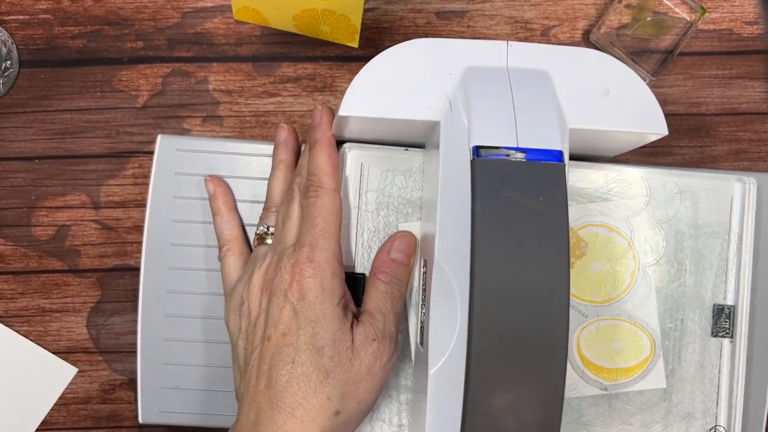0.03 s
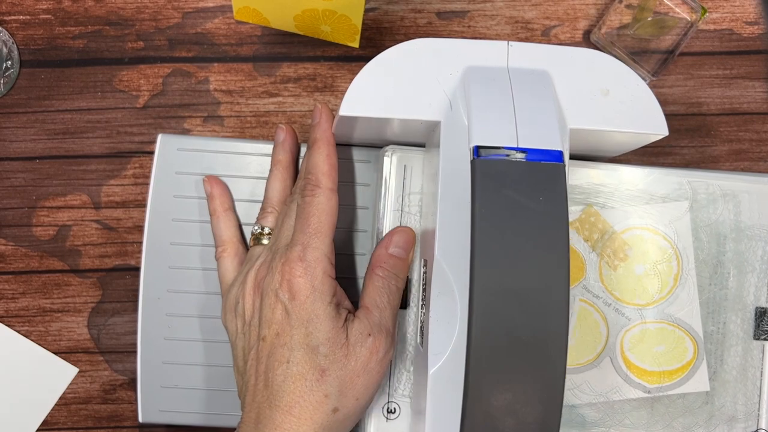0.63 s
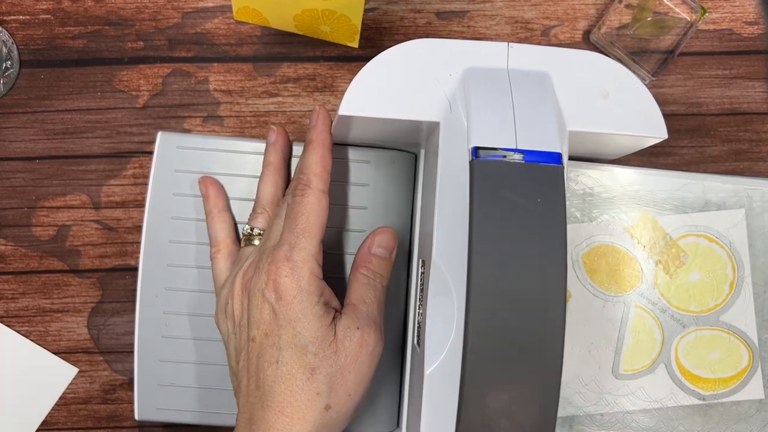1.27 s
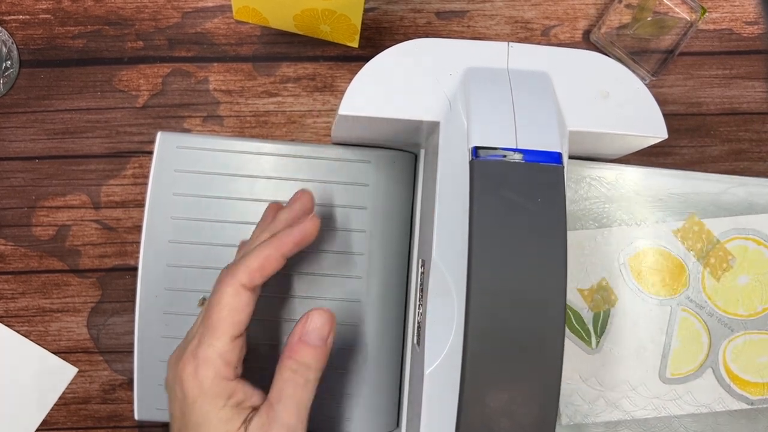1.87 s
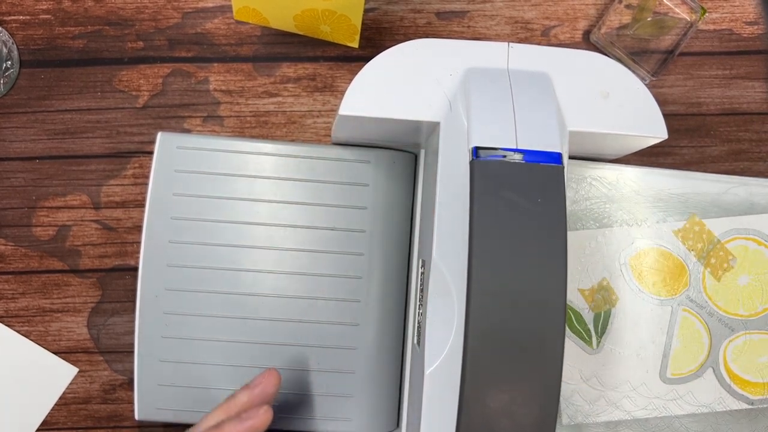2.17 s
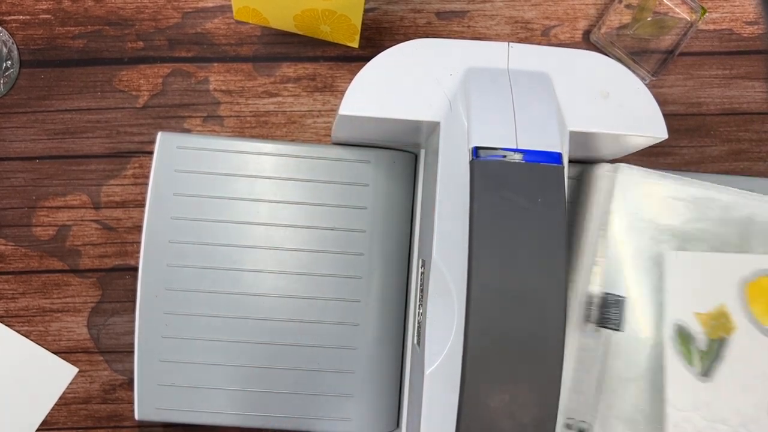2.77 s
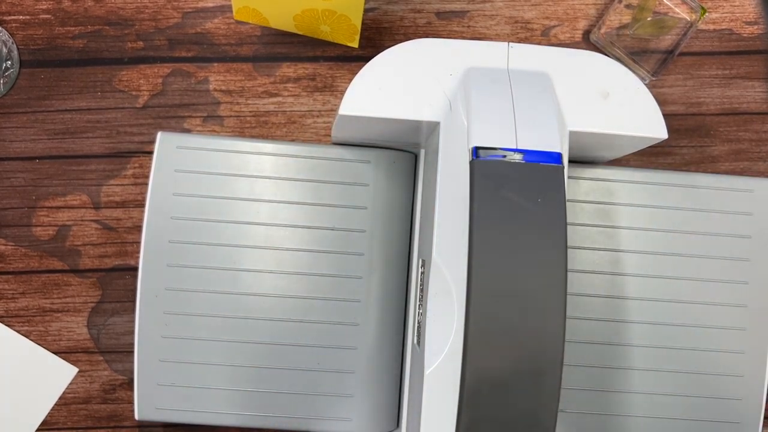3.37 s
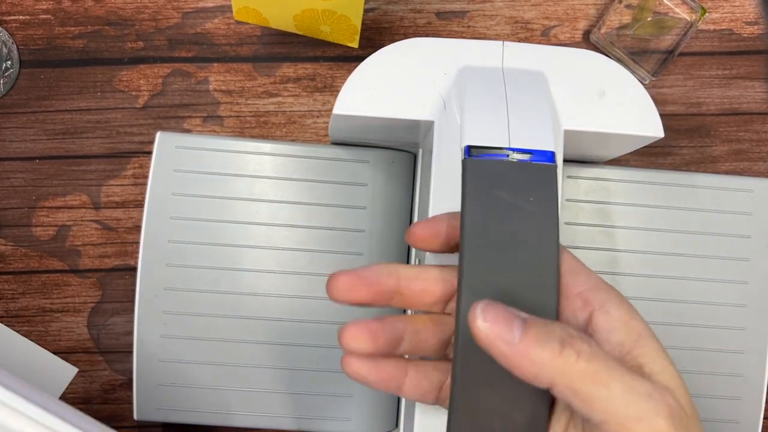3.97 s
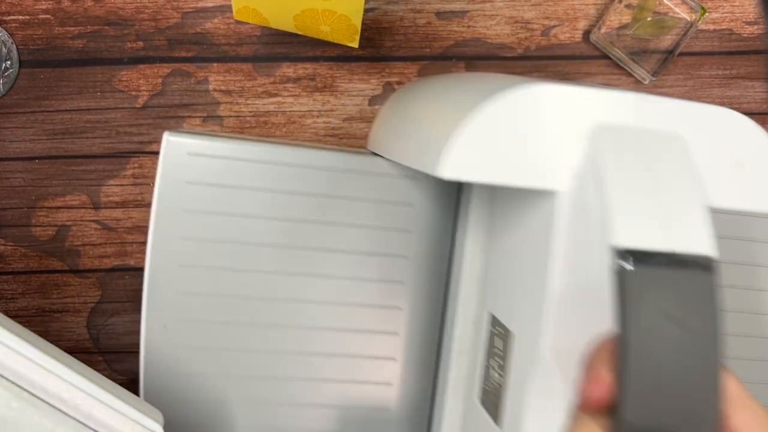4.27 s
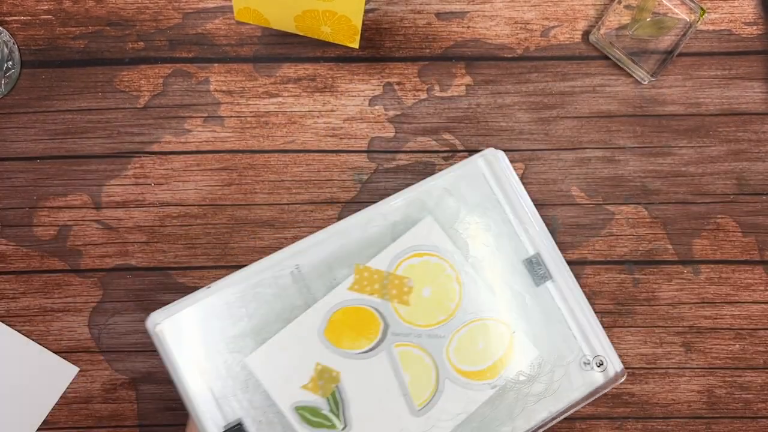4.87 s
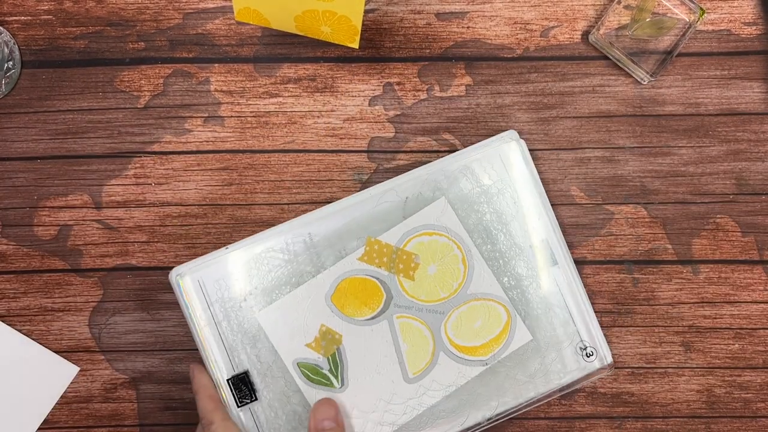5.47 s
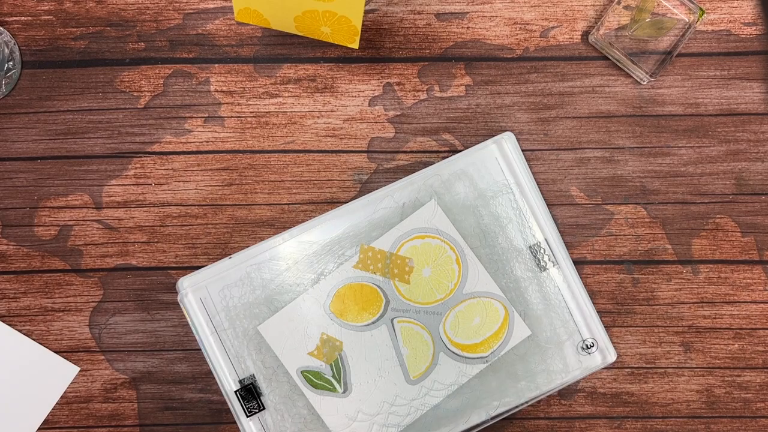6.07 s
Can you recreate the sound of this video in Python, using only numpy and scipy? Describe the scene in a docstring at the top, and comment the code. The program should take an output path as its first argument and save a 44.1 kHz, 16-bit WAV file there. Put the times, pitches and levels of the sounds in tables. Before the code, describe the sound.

A hand-cranked die cutter creaks, snaps and knocks as plastic plates roll through, then the stack clatters out and drops on a wooden table.

```python
"""A hand-cranked die cutter on a wooden table rolls a stack of plastic plates through its rollers.
Gears creak and rumble, the plates snap under pressure, the hollow housing knocks and the table booms.
The stack is lifted out with a clatter; parts tick and fingers brush the plates. The platform rings as
the machine is lifted. Fingertips tap the stack, which drops on the table and slides, in a small room."""
import sys
import numpy as np
from scipy import signal
from scipy.fft import rfft, irfft
from scipy.io import wavfile

SR = 44100
rng = np.random.default_rng(int(sys.argv[2]) if len(sys.argv) > 2 else 0)


def inscribe(sig):
    """Save sig as 16-bit PCM at rate SR to the path in sys.argv[1].

    A 1-D sig is mono; a 2-D sig holds one channel per row.
    Samples are clipped to [-1, 1] before scaling.
    """
    pcm = np.round(np.clip(np.atleast_2d(sig).T, -1, 1) * 32767)
    wavfile.write(sys.argv[1], SR, pcm.astype(np.int16))


N = 269451
TIME_S = np.arange(N) / SR
HIT_N = SR // 3
HIT_S = np.arange(HIT_N) / SR

# crank effort, greatest with the dies between the rollers; sliding stack: (time [s], level [dB])
CRANK_EFFORT = [(0, -57.5), (1.0, -56.5), (1.15, -51), (2.25, -63.5), (2.33, -75)]
SLIDE_LEVEL = [(5.55, -41.5), (5.76, -54.5), (5.85, -41.5), (6.11, -40.5)]
# light ticks of housing, plates and platform: (time [s], peak [dB])
LIGHT_TICKS = [(0.014, -30.5), (0.352, -31.5), (0.432, -34), (0.464, -32), (1.058, -37), (1.117, -31),
               (1.25, -34), (2.579, -29), (3.04, -40.5), (3.54, -31.5), (3.956, -45), (4.247, -41.5),
               (4.308, -33.5), (4.418, -32.5), (4.498, -32), (4.838, -41.5), (4.896, -33.5), (4.995, -37),
               (5.069, -35.5), (5.149, -38), (5.535, -33)]
# plates snapping; blows reaching the table: (time [s], level [dB], pitch [Hz])
PLATE_SNAPS = [(0.193, -14.5, 992), (0.624, -13, 1577)]
TABLE_THUMPS = [(0.772, -27, 300), (0.782, -26.5, 58), (1.208, -33, 127), (1.55, -29.5, 133),
                (1.75, -26, 117), (2.668, -34, 312), (2.693, -20, 235.6), (4.051, -20, 91),
                (4.883, -27, 111.6), (5.209, -30.5, 84), (5.554, -9.5, 343), (5.564, -15.5, 159),
                (5.579, -29, 196), (5.886, -37, 327)]
# blows on housing and stack: (time [s], strength [dB], hardness as treble over bass [dB], pitch [Hz])
HOUSING_KNOCKS = [(0.332, -30, -33, 800), (0.749, -28, -11, 820), (0.769, -7, -14, 770),
                  (1.077, -34.5, -8, 1660), (1.138, -33, -17, 830), (1.301, -22.5, -15, 1610),
                  (1.345, -29.5, -24, 860), (1.433, -36, -36, 850), (1.482, -31.5, -24, 1310),
                  (1.545, -34.5, -40, 845), (1.639, -27.5, -21.5, 970), (1.732, -20, -16.5, 1070),
                  (1.781, -24.5, -14.5, 950), (1.872, -25.5, -30, 870), (1.966, -29, -26.5, 854),
                  (2.027, -31.5, -15.5, 690), (2.159, -35, -25.5, 840), (2.205, -31, -38, 906),
                  (2.431, -38.5, -9, 1210), (2.449, -23, -14.5, 980)]
STACK_CLATTER = [(2.665, -6, -33.5, 890), (2.7, -6.5, -13, 1470), (2.761, -24.5, -42, 840),
                 (3.064, -29.5, -16.5, 890), (3.335, -27, -4, 1960), (4.055, -29, -9.5, 1130),
                 (4.069, -26, -14, 826), (4.917, -30.5, -4, 1830), (5.198, -27.5, -19, 2770),
                 (5.208, -25, -20.5, 900), (5.244, -29.5, -14, 1140), (5.551, -14, -44, 900),
                 (5.581, -31, -3, 1640), (5.595, -19, -42, 1150), (5.608, -25.5, -5.5, 1130),
                 (5.657, -36, -11, 2100), (5.689, -26.5, -9, 1150), (5.757, -33.5, -0.5, 1400)]
# fingers and plates brushing: (start [s], length [s], level [dB])
BRUSHES = [(3.259, 0.19, -58.5), (3.535, 0.48, -61.5), (3.766, 0.17, -56.5), (4.838, 0.34, -59)]
# modes: (frequency [Hz], level [dB], t60 [s])
HOUSING_MODES = [(691, -6, 0.16), (730, 5.5, 0.058), (856.5, 3, 0.067), (970, -3, 0.063),
                 (1173, -2.5, 0.11), (1753, 5, 0.069)]
TABLE_MODES = [(66, 0, .19), (118, 0, .12), (146, 1, .13), (202, -2.5, .11), (236, -1, .11), (280, 1, .1),
               (354, 4, .055)]
STACK_MODES = [(826, 3, 0.042), (952, 3, 0.037), (1134, -0.5, 0.07), (1554, 1, 0.0072), (1925, -4, 0.025),
               (2385, -3.5, 0.05), (2735, -5, 0.024)]
PLATFORM_MODES = [(769.5, 0.5, 0.35), (844, 2.5, 0.16), (1690, -2.5, 0.15)]
# dense small modes of housing and plates: (frequency [Hz], gain [dB])
PLASTIC_EQ = [(150, -14), (500, -8), (850, 0), (2300, -12.5), (6000, -22.5), (16000, -31.5)]
ACRYLIC_EQ = [(150, -7.5), (950, -0.5), (2200, -3.5), (4500, -6.5)]
# spectra of room air, tick, snap, brush and slide: (frequency [Hz], gain [dB])
AIR_EQ = [(20, -31), (58, 8.5), (85, -3), (250, -18), (1000, -34), (16000, -49.5)]
TICK_EQ = [(400, -11), (950, 5), (2000, -2), (6000, -18)]
CRACK_EQ = [(200, -17), (1000, -12.5), (4000, -10.5), (5400, -4.5), (9000, -5.5), (12000, 1.5),
            (16000, -15.5)]
BRUSH_EQ = [(1900, 4.5), (4000, -2.5), (13000, -4)]
SLIDE_EQ = [(60, -3.5), (1100, -6), (2700, -11.5), (3600, -16), (5500, -9), (6200, -6), (7000, -11.5),
            (16000, -20.5)]
# stereo difference passed by the microphone ports: (frequency [Hz], gain [dB])
SIDE_EQ = [(50, -10), (400, 1), (5000, 0), (9000, -24.5)]


def undb(db):
    """Decibels to gain."""
    return 10 ** (np.asarray(db) / 20)


def level(x, db):
    """Set the rms."""
    return x * undb(db) / np.sqrt(np.mean(x ** 2))


def peak(x, db):
    """Set the peak."""
    return x * undb(db) / np.abs(x).max()


def burst(x, db):
    """Set the rms of the first 25 ms."""
    return x * undb(db) / np.sqrt(np.mean(x[:, :SR // 40] ** 2))


def curve(rows):
    """Gain from (time [s], level [dB]) rows, silent outside them."""
    return undb(np.interp(TIME_S, *np.transpose(rows), left=-120, right=-120))


def fade(t60_s):
    """Exponential decay."""
    return np.exp(-np.log(1000) * HIT_S / max(t60_s, 1e-4))


def band(x, hz, kind, order=4):
    """Butterworth filter."""
    return signal.sosfilt(signal.butter(order, hz, kind, fs=SR, output="sos"), x)


def colour(x, eq):
    """Minimum-phase filter from (frequency [Hz], gain [dB]) rows."""
    hz, db = np.transpose(eq)
    size = 8192
    log_hz = np.log(np.fft.rfftfreq(size, 1 / SR) + 1)
    cepstrum = irfft(np.log(undb(np.interp(log_hz, np.log(hz), db))))
    cepstrum[1:size // 2] *= 2
    cepstrum[size // 2 + 1:] = 0
    impulse = irfft(np.exp(rfft(cepstrum)))
    return signal.oaconvolve(x, impulse[None], axes=1)[:, :x.shape[1]]


def noise(count, width=0.38):
    """Stereo noise; width is side over mid."""
    mid, side = rng.standard_normal((2, count))
    return np.array([mid + width * side, mid - width * side])


def wander(knots):
    """Random line across the scene."""
    return np.interp(TIME_S, np.linspace(0, TIME_S[-1], knots), rng.standard_normal(knots))


def add(track, at_s, sound):
    """Mix a sound in."""
    start = max(int(at_s * SR), 0)
    track[:, start:start + sound.shape[1]] += sound[:, :N - start]


def friction(grain_db):
    """Countless tiny slips, varying in strength every few ms."""
    slips = wander(N // 150)
    return noise(N) * undb(grain_db * slips)


def favour(modes, pitch_hz, db_per_oct=22.5):
    """The place of contact favours modes near one pitch."""
    return [(hz, db - db_per_oct * abs(np.log2(hz / pitch_hz)), t60_s) for hz, db, t60_s in modes]


def ring(modes, scatter_db=0.95, detune=0.015, spread_rad=0.12):
    """Damped modes build up, weighted anew by each contact; each side hears its own phase."""
    out = 0
    for hz, db, t60_s in modes:
        size, shift, start, skew = rng.standard_normal(4)
        phase = 2 * np.pi * (hz * (1 + detune * shift) * HIT_S + start)
        phase = phase + spread_rad * skew * np.array([[1], [-1]])
        out = out + undb(db + scatter_db * size) * np.sin(phase) * fade(t60_s)
    return out * (1 - fade(0.014)) ** 2


def gears():
    """Teeth and rollers catch unevenly and rumble in the table; plates hiss over the platform."""
    creaks = np.zeros((2, N))
    for at_s in np.arange(0, CRANK_EFFORT[-1][0], 0.036):
        late, size = rng.standard_normal(2)
        creak = ring(favour(HOUSING_MODES, 900), scatter_db=6, detune=0.09)
        add(creaks, at_s + 0.019 * late, burst(creak * fade(0.1) * (1 - fade(0.008)), 5 * size))
    teeth = colour(band(friction(3.7), 1700, "low"), PLASTIC_EQ)
    rumble = band(friction(2.1), [55, 200], "band")
    surge = undb(2 * wander(60))
    hiss = band(friction(2), [2500, 14000], "band") * surge
    mix = level(creaks, -4) + level(teeth, -7) + level(rumble, -2) + level(hiss, -10.5)
    return mix * curve(CRANK_EFFORT)


def light_ticks():
    """Light, dry ticks of housing, plates and platform."""
    out = np.zeros((2, N))
    for at_s, db in LIGHT_TICKS:
        add(out, at_s, peak(colour(noise(HIT_N) * fade(0.05), TICK_EQ), db))
    return out


def scatter(x, swell_s, count=14):
    """A cluster of delayed copies that swells and dies away."""
    jitter, size = rng.random(count), rng.standard_normal(count)
    age = (np.arange(count) + jitter) / 3
    lags = (age * swell_s * SR).astype(int)
    impulse = np.bincount(lags, size * age * np.exp(-age))
    return signal.fftconvolve(x, impulse[None], axes=1)[:, :x.shape[1]]


def plate_snaps(resonance_db=14.5, echo_s=0.0081):
    """Stress lets go: a short crack with one broad resonance, thrown back by a nearby hard surface."""
    out = np.zeros((2, N))
    for at_s, db, hz in PLATE_SNAPS:
        spectrum = rfft(noise(HIT_N) * fade(0.017))
        tilted = irfft(spectrum / np.sqrt(np.abs(spectrum)), HIT_N)
        crack = colour(tilted * fade(0.04), CRACK_EQ)
        crack = colour(crack, [(hz / np.sqrt(2), 0), (hz, resonance_db), (hz * np.sqrt(2), 0)])
        add(out, at_s, burst(crack, db - 11))
        add(out, at_s + echo_s, burst(scatter(crack, swell_s=0.0049), db - 18.5))
    return out


def dense_modes(eq, t60_s, contact_s):
    """The crowd of small modes in a struck plastic part."""
    return colour(noise(HIT_N) * fade(t60_s) * (1 - fade(6 * contact_s)), eq)


def blows(events, modes, eq, *, dense_t60_s, tick_t60_s, base_contact_s, drag,
          knock_db, clack_db, ring_db, tick_db, rebound_db):
    """Plastic on plastic: knock, clack, ring, tick and rebound; drag lengthens weak contacts."""
    out = np.zeros((2, N))
    for at_s, low_db, hard_db, pitch_hz in events:
        mid_db, high_db = low_db + 0.59 * hard_db, low_db + hard_db
        contact_s = base_contact_s * undb(-drag * low_db)
        strike = dense_modes(eq, dense_t60_s, contact_s)
        rebound = dense_modes(eq, dense_t60_s, contact_s)
        tick = colour(noise(HIT_N, 0.62) * fade(tick_t60_s) * (1 - fade(2 * contact_s)), eq)
        add(out, at_s - contact_s, peak(band(strike, 1200, "low"), low_db + knock_db))
        add(out, at_s - contact_s, burst(band(strike, [1400, 4000], "band"), mid_db + clack_db))
        drive_db = min(low_db, -12.5)  # heavier blows press the parts together and ring no louder
        add(out, at_s, burst(ring(favour(modes, pitch_hz)), drive_db + ring_db))
        tick = burst(band(tick, 3800, "high"), high_db + tick_db)
        top_db = 0.32 * min(high_db + 30, 11)  # weaker tick: longer contact, duller top octave
        add(out, at_s, colour(tick, [(7000, 0.0031), (12500, top_db)]))
        rebound_s = at_s + rng.uniform(0.0079, 0.023)
        add(out, rebound_s, peak(band(rebound, 2600, "low"), low_db + rebound_db))
        # a faint swell of noise softens the onset
        faint = burst(colour(noise(HIT_N) * fade(0.06), eq), (low_db + mid_db) / 2 - 25.5)
        swell_n = min(int(at_s * SR), SR // 20)
        add(out, at_s - swell_n / SR, faint[:, swell_n::-1])
    return out


def housing_knocks():
    """The hollow housing knocks as the crank turns."""
    return blows(HOUSING_KNOCKS, HOUSING_MODES, PLASTIC_EQ,
                 dense_t60_s=0.049, tick_t60_s=0.064, base_contact_s=0.000795, drag=0.42,
                 knock_db=-1, clack_db=-7.5, ring_db=-12.5, tick_db=-2.5, rebound_db=-12.5)


def push(db, pitch_hz, rise_cycles=5.4):
    """The table top booms; the length of the push decides which modes answer most."""
    load_shifts = 1 + 0.036 * rng.standard_normal(len(TABLE_MODES))
    boom = 0
    for (hz, mode_db, t60_s), shift in zip(favour(TABLE_MODES, pitch_hz, db_per_oct=9.5), load_shifts):
        boom = boom + undb(mode_db) * np.sin(2 * np.pi * hz * shift * HIT_S) * fade(t60_s)
    panels = band(noise(HIT_N, 0.5) * fade(0.14), min(1.9 * pitch_hz, 480), "low")
    return (peak(boom, db + 11.5) + peak(panels, db - 10)) * (1 - fade(rise_cycles / pitch_hz))


def table_thumps(settle_s=0.012, settle_hz=79, feet_hz=272):
    """Each blow pushes the table, then its weight settles; housing knocks enter via the rubber feet."""
    out = np.zeros((2, N))
    for at_s, db, pitch_hz in TABLE_THUMPS:
        add(out, at_s, push(db, pitch_hz))
        add(out, at_s + settle_s, push(db - 11.5, settle_hz))
    for at_s, db, _, _ in HOUSING_KNOCKS:
        add(out, at_s, push(0.77 * db - 22, feet_hz))
    return band(out, 45, "high", order=2)


def stack_clatter():
    """The plates and their dies strike each other."""
    return blows(STACK_CLATTER, STACK_MODES, ACRYLIC_EQ,
                 dense_t60_s=0.062, tick_t60_s=0.035, base_contact_s=0.00112, drag=0,
                 knock_db=-6.5, clack_db=-12.5, ring_db=-14.5, tick_db=-1.5, rebound_db=-17)


def brushes(ramp_s=0.01):
    """Fingers and plates rub until the surfaces part."""
    contact = 0
    for start_s, length_s, db in BRUSHES:
        inside_s = np.minimum(TIME_S - start_s, start_s + length_s - TIME_S)
        contact = contact + undb(db) * np.clip(inside_s / ramp_s + 0.5, 0, 1)
    return level(colour(friction(3.3), BRUSH_EQ), 0) * contact


def platform_ring(lift_s=4.52, peak_db=-32):
    """The platform judders and rings once free of the table; its pitch sags as it dies."""
    out = np.zeros((2, N))
    sagging_s = np.cumsum(1 - 0.17 * (1 - fade(0.306))) / SR
    knots_s = HIT_S[::220]
    judder = 1 + 0.6 * np.interp(HIT_S, knots_s, rng.standard_normal(len(knots_s)))
    tone = np.array([np.interp(sagging_s, HIT_S, side) for side in ring(PLATFORM_MODES)])
    add(out, lift_s, peak(judder * tone, peak_db))
    return out


def finger_taps(start_s=5.28, end_s=5.53, gap_s=0.041):
    """Soft fingertips shift their grip on the stack: dull, uneven taps."""
    out = np.zeros((2, N))
    for at_s in np.arange(start_s, end_s, gap_s):
        late, size = rng.standard_normal(2)
        tap = band(noise(HIT_N) * fade(0.14) * (1 - fade(0.013)), [280, 1000], "band")
        add(out, at_s + 0.0028 * late, peak(tap, -43 + 2 * size))
    return out


def stack_slide():
    """The stack scrapes along the table; plate resonances colour the hiss."""
    plates = noise(HIT_N, 0) * fade(0.089)
    plates[:, 0] += np.sqrt(np.sum(plates ** 2))  # direct path
    hiss = signal.oaconvolve(friction(0.79), plates, axes=1)[:, :N]
    return level(colour(hiss, SLIDE_EQ), 0) * curve(SLIDE_LEVEL)


def room(x, wet_db=-8):
    """Small room: first reflections after about 9 ms, treble dying sooner."""
    tail = noise(HIT_N, 0.8)
    tail = band(tail, 5300, "low") * fade(0.33) + band(tail, 4800, "high") * fade(0.31)
    tail = band(tail, 71, "high") * np.clip((HIT_S - 0.008) / 0.0013, 0, 1)
    tail *= undb(wet_db) / np.sqrt(np.sum(tail ** 2) / 2)
    return x + signal.oaconvolve(x, tail, axes=1)[:, :N]


def scene():
    """Machine, plates and table; the snaps radiate mostly away into the room."""
    knocks, clatter = housing_knocks(), stack_clatter()
    air = level(colour(noise(N, 0.13), AIR_EQ), -50.5)
    machine = room(knocks + gears())
    handling = room(clatter + light_ticks() + platform_ring() + brushes() + finger_taps())
    return machine + handling + room(plate_snaps(), wet_db=1) + room(table_thumps()) + stack_slide() + air


def record(dry):
    """Two close microphone ports: left brighter, right turning its phase near 10 kHz."""
    mid = (dry[:1] + dry[1:]) / 2
    side = colour((dry[:1] - dry[1:]) / 2, SIDE_EQ)
    left = colour(mid + side, [(2500, -1), (9000, -6)])[0]
    right = colour(mid - side, [(2500, -0.5), (5300, -8), (9000, -7)])[0]
    right = right - 2 * signal.lfilter(*signal.iirpeak(10000, 3, fs=SR), right)
    lowpass = signal.ellip(8, 0.2, 70, 15600, fs=SR, output="sos")
    return signal.sosfilt(lowpass, np.array([left, right]))


dry = scene()
out = record(dry)
inscribe(out)
```